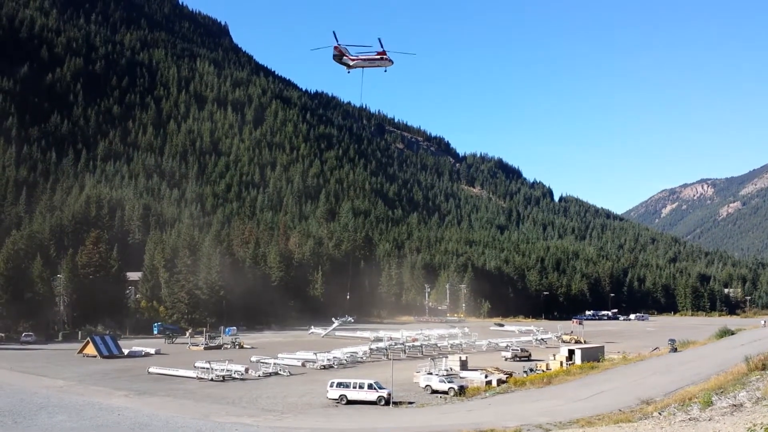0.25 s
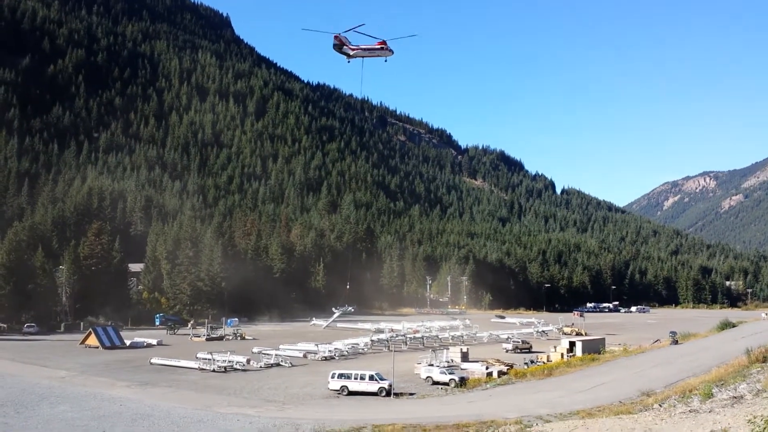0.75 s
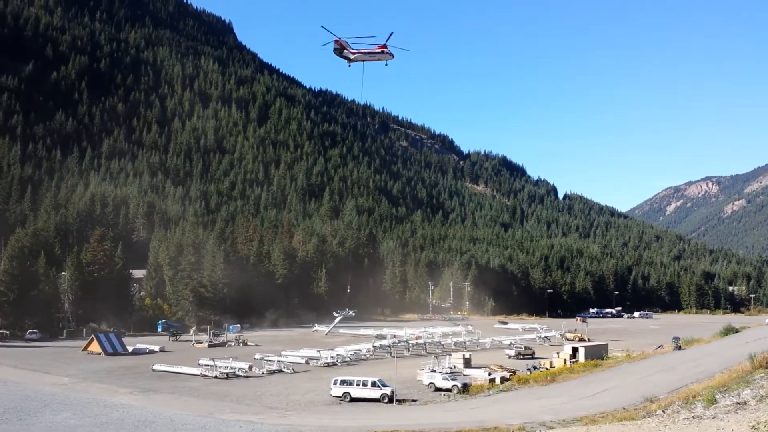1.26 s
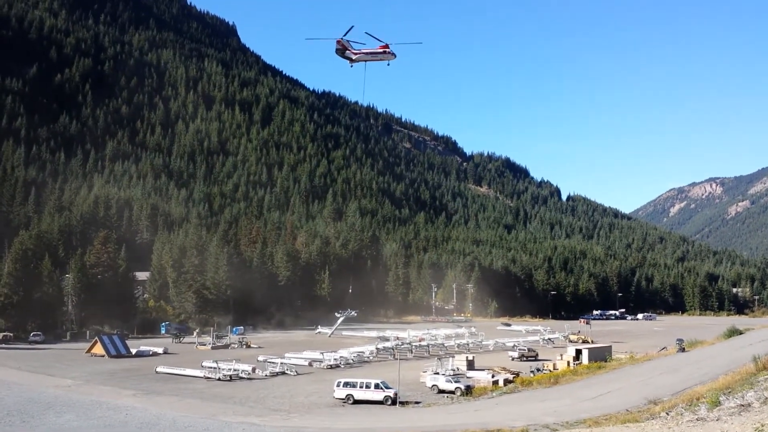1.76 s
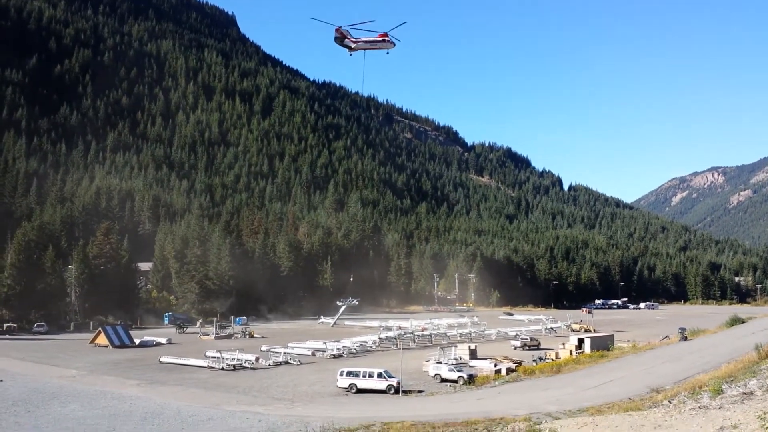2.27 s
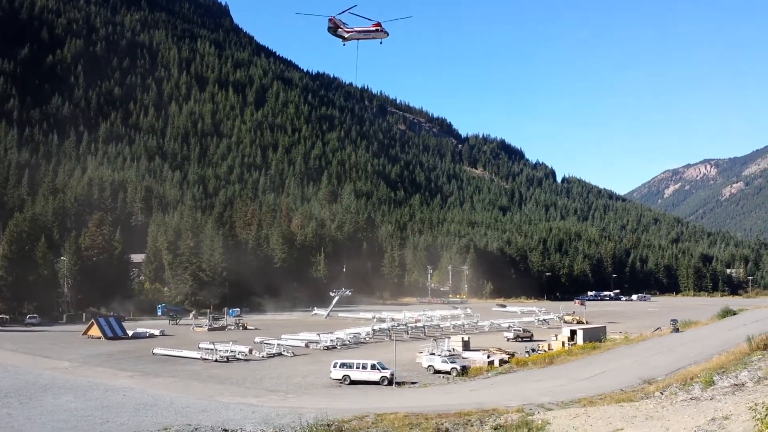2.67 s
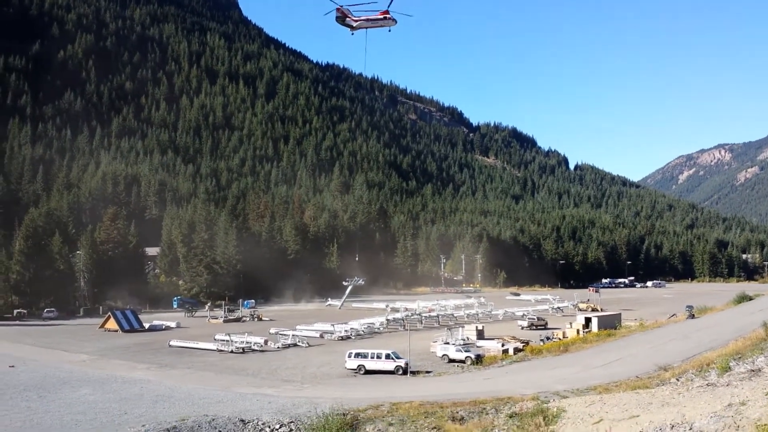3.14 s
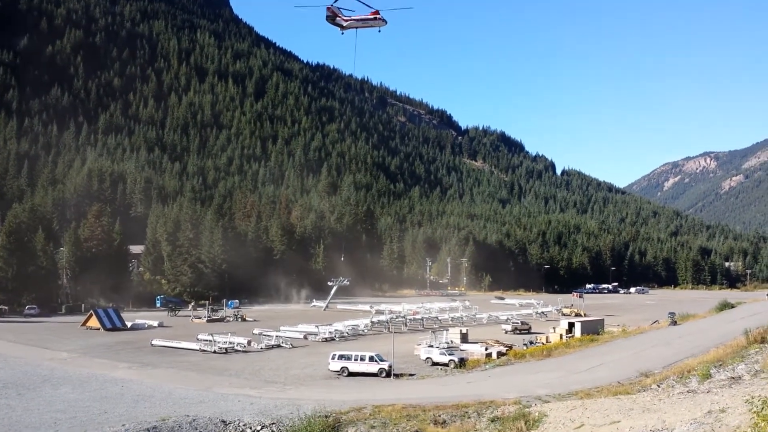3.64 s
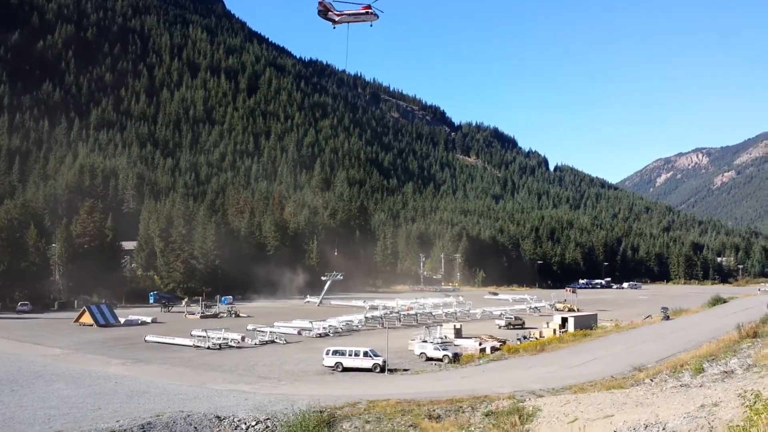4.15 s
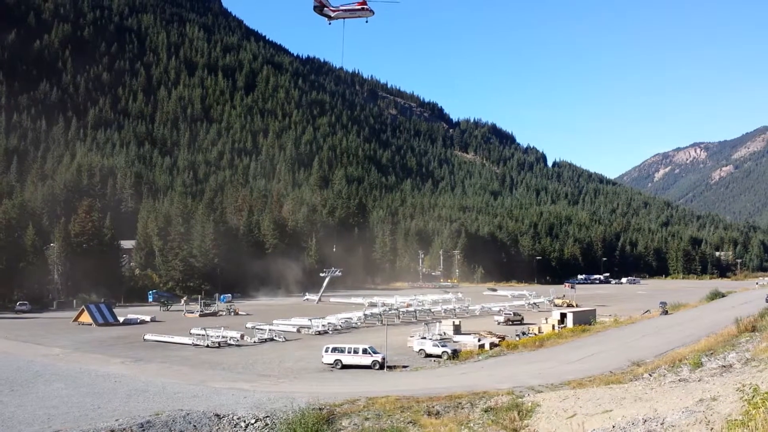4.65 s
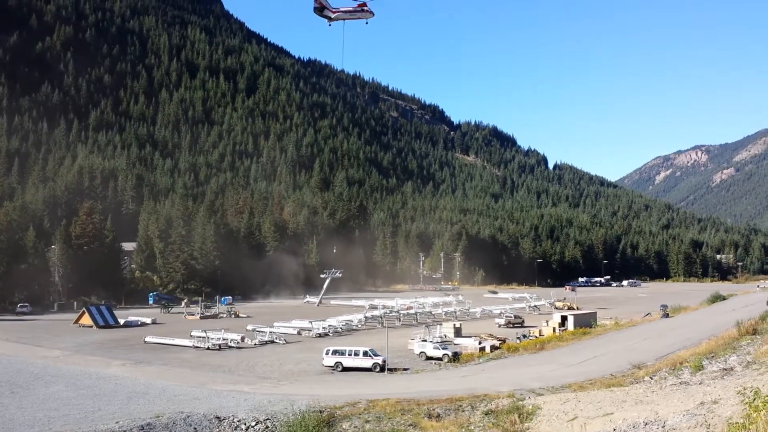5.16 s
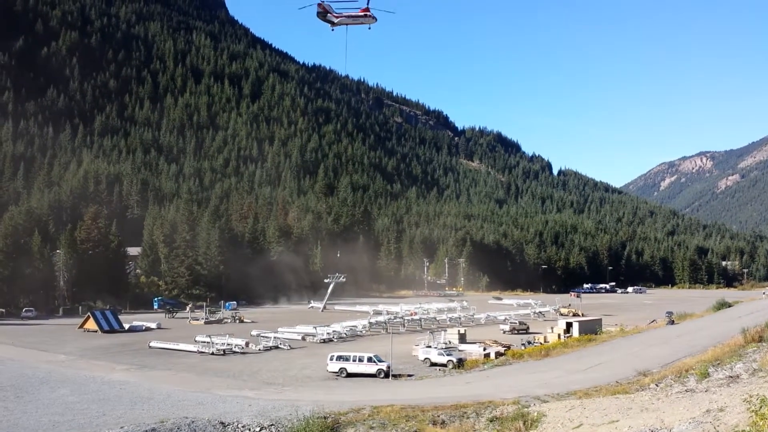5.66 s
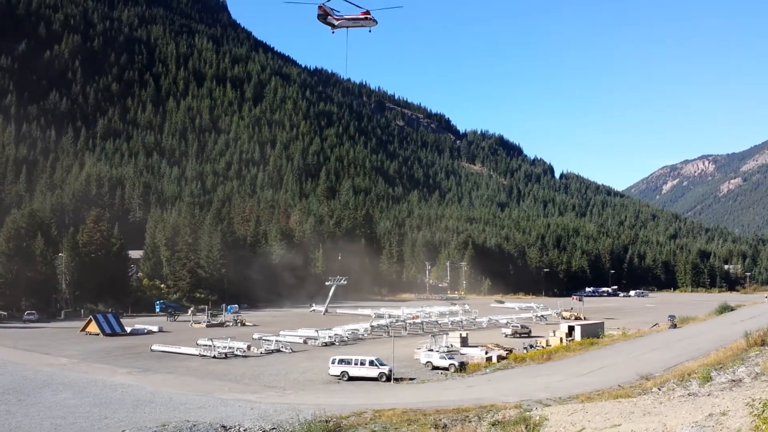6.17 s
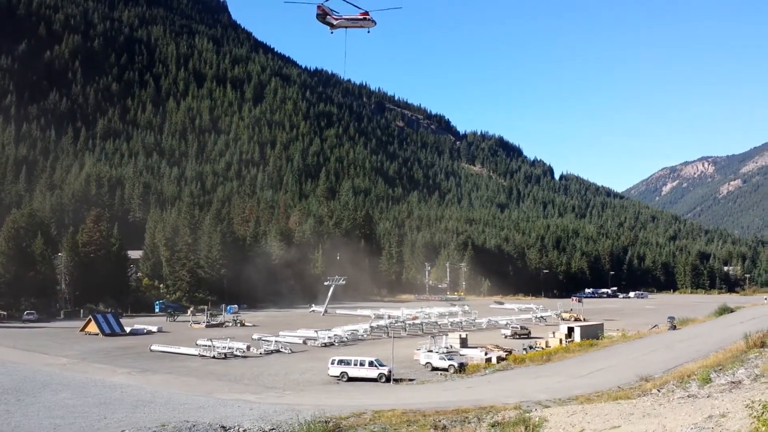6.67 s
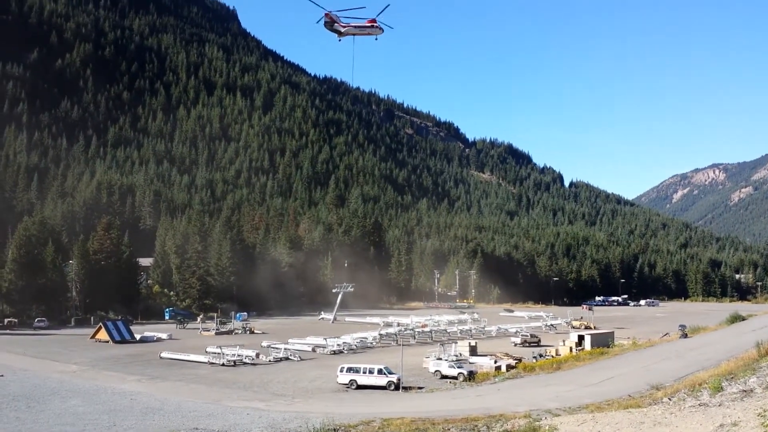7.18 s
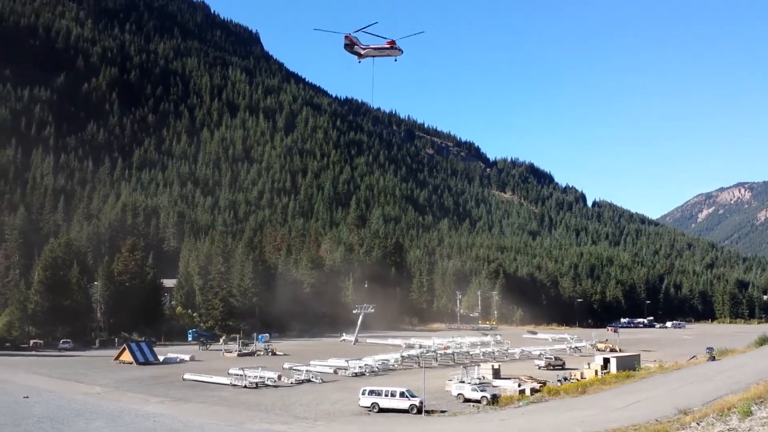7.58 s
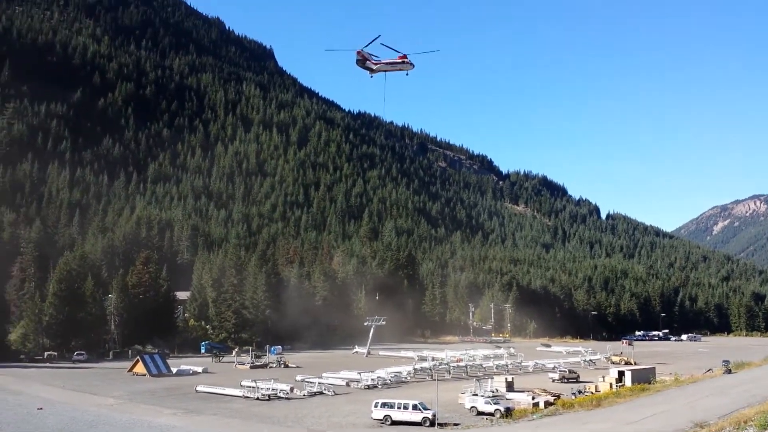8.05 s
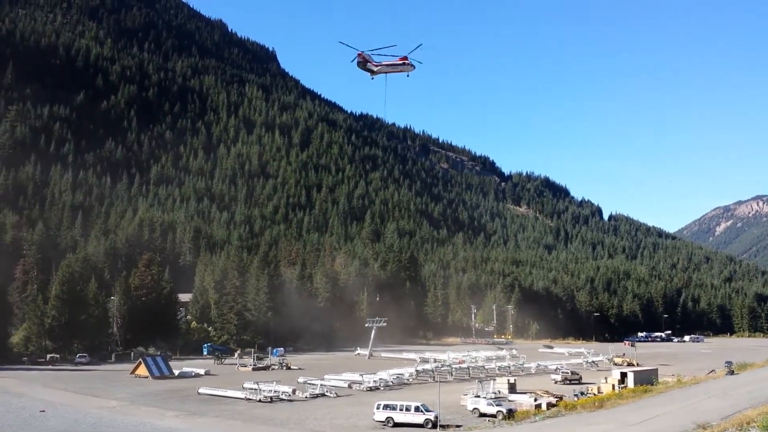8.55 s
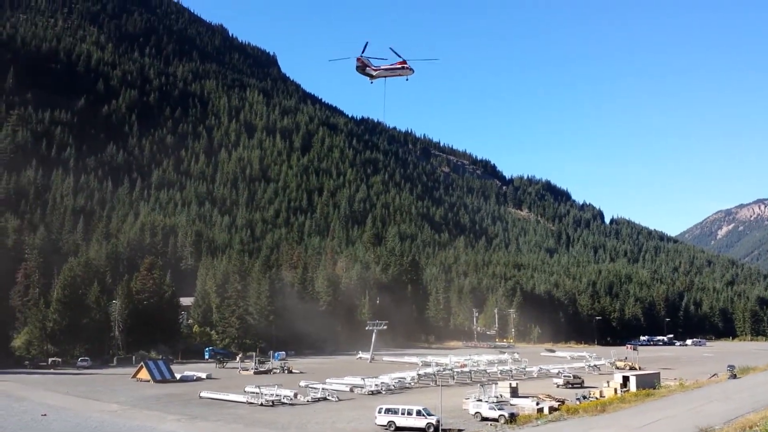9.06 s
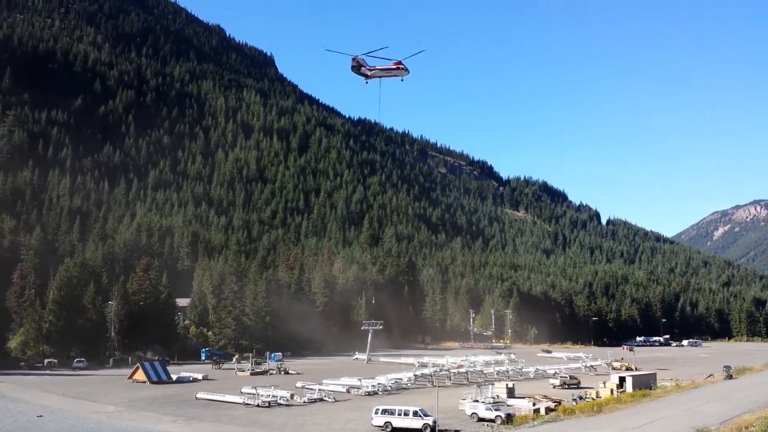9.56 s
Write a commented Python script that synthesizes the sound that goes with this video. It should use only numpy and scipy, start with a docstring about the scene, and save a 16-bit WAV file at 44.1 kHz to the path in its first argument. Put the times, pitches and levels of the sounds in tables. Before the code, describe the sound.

Rapid thudding rotor chop, about thirteen double beats a second, with sharp cracks, windy roar, faint gear whine and slope echoes throughout.

```python
"""A gravel lot below a forested mountainside, where a heavy tandem-rotor helicopter hovers.
Each blade radiates a low thump and a slap as filtered pulses; steep spikes add the cracks of cut vortices.
Random delayed copies make the slope's echo, steady lags its faces, and late clicks the gravel's returns.
Shaped noise gives downwash, rumble, blade swish and a rustle; wavering tones give a gear whine and hums.
A bright ringing tick and later two hard clicks on the right are heard; thin clicks join the second rotor."""
import sys
import numpy as np
from scipy import signal
from scipy.fft import rfft, irfft, next_fast_len
from scipy.io import wavfile
from scipy.ndimage import uniform_filter1d, minimum_filter1d

SR = 44100
rng = np.random.default_rng(int(sys.argv[2]) if len(sys.argv) > 2 else 0)


def pcm_store(signal):
    """Save signal as 16-bit PCM."""
    levels = np.round(np.clip(np.atleast_2d(signal), -1, 1) * 32767)
    wavfile.write(sys.argv[1], SR, levels.astype(np.int16).T)


N = 433062
TIME = np.arange(N) / SR
SOUND_SPEED = 343  # m/s
# blade period, first arrival and second rotor's offset before travel delay, all in s
BLADE_S, FIRST_S, SECOND_ROTOR_S = .07597, .060, .038


def undb(db):
    """Logarithmic level: decibels become an amplitude ratio."""
    return 10 ** (np.asarray(db) / 20)


def curve(table, at, axis):
    """Linear interpolation: one column of a table is joined by straight lines."""
    rows = np.array(table)
    return np.interp(at, rows[:, 0], rows[:, axis])


def unit(x):
    """Normalisation: the signal is scaled to rms 1."""
    return x / np.sqrt(np.mean(x ** 2))


def colour(x, spectrum, lean=0, causal=False):
    """Linear filtering: lean/rad skews a pulse by phase rotation; causal selects minimum phase."""
    size = 2 * next_fast_len((N + SR // 4) // 2)
    hz, db = np.transpose(spectrum)
    freq = np.maximum(np.arange(size // 2 + 1) * SR / size, 1)
    gain = undb(np.interp(np.log(freq), np.log(hz), db))
    if causal:
        # folding the cepstrum makes the response ring only after it starts
        cepstrum = irfft(np.log(gain))[:size // 2]
        gain = np.exp(2 * rfft(cepstrum, size) - cepstrum[0])
    response = gain * np.exp(1j * lean)
    return irfft(rfft(x, size) * response, size)[..., :N]


def pulses(times, db, spectrum, lean=0, causal=False):
    """Impulse response: each time gets a pressure dip, db being its level over 5 ms."""
    train = np.zeros(N)
    places = np.clip(np.round(times * SR).astype(int), 0, N - 1)
    np.add.at(train, places, -undb(db) * (times < N / SR))
    hz, gain_db = np.transpose(spectrum)
    log_freq = np.log(np.arange(1, SR // 2))
    energy = np.mean(undb(np.interp(log_freq, np.log(hz), gain_db)) ** 2)
    return colour(train, spectrum, lean, causal) / np.sqrt(energy / (.005 * SR))


def walk(rate):
    """Random modulation: normal values, rate per second, joined by lines, with a spread near 1."""
    knots = rng.standard_normal(2048)
    return 1.2 * np.interp(TIME * rate, np.arange(len(knots)), knots)


def air(spectrum, apart_hz):
    """Spatial coherence: stereo noise is alike at both ports in the bass, far less so in the treble."""
    mid, side = rng.standard_normal((2, N))
    side = signal.sosfilt(signal.butter(2, apart_hz, "high", fs=SR, output="sos"), side)
    return unit(colour(mid + undb(-1.0) * np.array([side, -side]), spectrum))


# Drift of the hover: [t/s, extra distance from the listener/m]
DRIFT = [(0, 0), (.7, .1), (3, -.55), (3.7, -.15), (4.3, -.03), (6.2, -.55), (7.4, .1), (9.2, 1.35),
         (9.8, 2)]


def travel_delay(times):
    """Propagation delay: extra distance divided by the speed of sound."""
    return curve(DRIFT, times, axis=1) / SOUND_SPEED


def blades(offset):
    """Periodic source: one rotor's blades arrive in turn, later as the aircraft drifts off."""
    times = FIRST_S + offset + BLADE_S * np.arange(int(N / SR / BLADE_S) + 1)
    return times + travel_delay(times)


def throb(delay_s, width_s):
    """Periodic modulation: a smooth swell once per blade, delay_s after the first rotor's thump."""
    turn = (TIME - FIRST_S - delay_s - travel_delay(TIME)) / BLADE_S
    return np.exp(-(np.sin(np.pi * turn) * BLADE_S / np.pi / width_s) ** 2)


# The rotors work harder, ease off and return: [t/s, thump relative level/dB, downwash relative level/dB]
HOVER = [(0.1, -33, -32.5), (0.47, -35, -35), (1.17, -28, -31.5), (1.78, -28.5, -29.5), (3.33, -26.5, -28),
         (3.63, -28.5, -26.5), (4.91, -27, -26), (6.41, -21, -22), (8.07, -21, -25), (8.79, -25, -24.5),
         (9.51, -19.5, -25), (9.7, -21.5, -23)]
# Downwash spectrum: [f/Hz, relative level/dB]
WASH_SPECTRUM = [(20, -4), (60, -2.5), (120, 10), (200, 12), (330, 10), (500, 8.5), (830, 3), (1050, 1),
                 (1600, 0), (2250, 0.45), (2900, -7.5), (4400, -10), (5500, -17.5), (6400, -18.5),
                 (8700, -32.5), (11000, -90.5)]


def downwash():
    """Turbulence noise: torn air lulls before each first-rotor blade and surges after; each band churns."""
    surge = 1 + .5 * throb(0.0041, 0.0037) + 0.34 * throb(0.029, 0.012) - 0.14 * throb(-0.0078, 0.003)
    rest, roar = air(WASH_SPECTRUM, apart_hz=895), 0
    for edge_hz in (450, 1100, 1900, 3000):
        band = signal.sosfiltfilt(signal.butter(3, edge_hz, fs=SR, output="sos"), rest)
        roar = roar + band * undb(2 * walk(55))
        rest = rest - band
    churn = undb(0.93 * walk(70) + 0.11 * walk(11))
    return unit(roar + rest) * unit(surge * churn) * undb(curve(HOVER, TIME, axis=2))


def breeze(db):
    """Incoherent flow noise: stirred air rumbles softly on each port by itself, at the thump's level curve."""
    spectrum = [(15, -19.0), (40, -7.5), (60, 5.0), (110, -6.5), (300, -3.0), (600, -1.5), (3000, -79.5)]
    rumble = colour(rng.standard_normal((2, N)), spectrum)
    return unit(rumble) * undb(db + curve(HOVER, TIME, axis=1) + 1.6 * walk(3.0))


# Louder swishes of a blade tip: [t/s, level/dB, half length/s]
SWISHES = [(0.238, -32, 0.0072), (6.533, -30.5, 0.0086), (7.532, -26, 0.019), (7.608, -26, 0.0053),
           (7.677, -25.5, 0.015), (7.763, -34, .007), (8.133, -44, 0.0044), (8.222, -31, .008),
           (8.903, -28, 0.0043), (8.978, -23, 0.0049), (9.056, -32, 0.0054)]
# Swish spectrum: [f/Hz, relative level/dB]
SWISH_SPECTRUM = [(300, -45.5), (1500, -23.5), (3000, 1), (4200, 11), (5500, 3), (6800, -3.5),
                  (8800, -13.5), (12000, -79.5)]


def swish():
    """Amplitude-modulated noise: blade tips hiss as they swing towards the listener, a few much louder."""
    flicker_db = 3.5 * walk(13)
    steady = throb(0.024, 0.0094) * undb(curve(HOVER, TIME, axis=2) - 11.5 + flicker_db)
    flares = sum(undb(db) * np.exp(-((TIME - s) / length_s) ** 2) for s, db, length_s in SWISHES)
    return air(SWISH_SPECTRUM, apart_hz=1000) * (steady + flares)


# Gear whine: [t/s, level/dB]
WHINE = [(0, -52), (1.5, -51), (1.95, -41), (2.2, -48), (2.6, -44.5), (3.1, -50), (3.5, -43.5), (4.9, -40),
         (5.3, -35), (5.55, -35.5), (5.8, -40), (6.3, -36.5), (7.1, -41.5), (7.7, -36), (8.05, -45.5),
         (8.35, -34.5), (8.9, -41.5), (9.2, -35.5), (9.8, -43.5)]


def gearbox(hz, flutter_db):
    """Doppler shift: a whine sinks as the aircraft backs off; moving air gives its line a skirt of flutter."""
    heard_s = TIME - travel_delay(TIME)
    phase = 2 * np.pi * hz * (heard_s + np.cumsum(0.000986 * walk(7)) / SR)
    line = [np.sin(phase + 1.0 * walk(20)) * undb(3.5 * walk(16)) for _ in range(2)]
    skirt = [walk(60) * np.sin(phase) + walk(60) * np.cos(phase) for _ in range(2)]
    whine = unit(unit(np.array(line)) + undb(flutter_db) * unit(np.array(skirt)))
    return whine * undb(curve(WHINE, TIME, axis=1))


# Echo from the slope: [t/s, relative level/dB]
ECHO = [(0, -27.5), (.6, -28.5), (1.25, -20), (1.9, -24.5), (3, -21.5), (4.4, -19), (5.1, -21.5),
        (5.8, -16.5), (7, -18), (8.1, -21), (9.8, -20)]
# Slope and hollow-boom spectra: [f/Hz, relative level/dB]
SLOPE_SPECTRUM = [(20, -64), (45, -43.5), (100, 0.5), (150, -8.5), (225, 6), (260, -8), (330, 1),
                  (450, -20.5), (620, -14), (820, -3), (1100, -19), (2200, -33), (4000, -71.5),
                  (12000, -110)]
BOOM_SPECTRUM = [(30, -67.5), (140, -10), (185, 1), (205, 9.5), (235, -9.5), (280, -25), (2000, -93.5)]


def slope(times, t60, shift_rate, side_db, count=5):
    """Reverberation: trees and slope scatter every pulse; paths trade places as the aircraft moves."""
    chance = rng.standard_normal((len(times), 2)).T
    wander_s = .0005 * chance[0]
    source = pulses(times + wander_s, 1.5 * chance[1], SLOPE_SPECTRUM)
    # a hollow boom builds up in the valley, then holds
    start_db, full_db, full_s = -25.5, -0.5, 9.2
    boom_db = start_db + (full_db - start_db) * np.minimum(times / full_s, 1)
    source = source + pulses(times + wander_s, boom_db + 3.2 * chance[1], BOOM_SPECTRUM)
    size = next_fast_len(N)
    spectrum, age = rfft(source, size), TIME[:SR]
    echoes = []
    for _ in range(count + 1):
        # about 160 reflections a second, falling 60 dB per t60
        paths = rng.standard_normal(SR) * (rng.random(SR) < 160 / SR) * undb(-60 * age / t60)
        # the hover is already under way, so the tail wraps round to fill the start
        echoes.append(unit(irfft(spectrum * rfft(paths, size), size)[:N]))
    weights = np.array([walk(shift_rate) for _ in range(count)])
    mid = np.sum(weights * echoes[:count], axis=0) / np.sqrt(np.sum(weights ** 2, axis=0))
    side = np.array([echoes[-1], -echoes[-1]])
    return (mid + undb(side_db) * side) * undb(curve(ECHO, TIME, axis=1))


# Overtones of the beat that stand out of the echo: [t/s, half length/s, f/Hz, level/dB]
HUMS = [(3.598, 5.1, 236.9, -26), (6.399, 1.1, 184.4, -29.5), (9.2, 1, 197.3, -21.5)]


def hums():
    """Harmonics: single overtones of the beat swell out of the echo for a while, wavering a little."""
    out = 0
    for s, length_s, hz, db in HUMS:
        phase = 2 * np.pi * np.cumsum(hz * (1 + 0.003 * walk(9))) / SR
        swell = np.exp(-((TIME - s) / length_s) ** 2)
        out = out + np.sin(phase) * undb(db + 1.7 * walk(13)) * swell
    return out


# Round slap of each rotor, steadier than its crack: [t/s, first rotor level/dB, second rotor level/dB]
SLAPS = [(0, -16, -31), (.6, -16, -21.5), (2.4, -13.5, -32), (3.4, -10.5, -19), (4.6, -17, -21),
         (5.2, -20, -24), (6.1, -19, -16.5), (7.5, -15.5, -24), (8.7, -17.5, -18), (9.8, -18.5, -13.5)]
# Trim of the deepest part of the thump: [t/s, level/dB]
DEEP = [(0, 2), (1.2, -3), (2.5, -3), (3.8, -0.5), (5.5, 2.5), (6.5, 1.5), (7.8, -2), (8, -7), (8.8, -2),
        (9.8, -2)]
# Thump and slap spectra: [f/Hz, relative level/dB]
THUMP_SPECTRUM = [(18, -66.5), (27, -43.5), (39, -39.5), (52, -6.5), (80, -5), (110, -0.5), (160, -4),
                  (250, -35), (400, -47), (900, -75.5), (3000, -110)]
SLAP_SPECTRUM = [(20, -68), (70, -22.5), (160, 7), (260, 12.5), (380, 8), (520, -13), (820, -21),
                 (1500, -37), (4000, -61), (12000, -100)]


def rotor(times, column, thump_db, thump_lean, slap_lead_s, slap_lean):
    """Impulsive radiation: each blade makes a round thump and an uneven slap, a deep dip of pressure."""
    chance = rng.standard_normal((len(times), 3)).T
    thump_level = curve(HOVER, times, axis=1) + thump_db + 0.28 * chance[0]
    thump = pulses(times, thump_level, THUMP_SPECTRUM, thump_lean)
    deep = signal.sosfiltfilt(signal.butter(4, 90, fs=SR, output="sos"), thump)
    thump = thump + deep * (undb(curve(DEEP, TIME, axis=1)) - 1)
    slap_times = times - slap_lead_s + 0.00018 * chance[1]
    slap_level = curve(SLAPS, times, axis=column) + 1.0 * chance[2]
    return thump + pulses(slap_times, slap_level, SLAP_SPECTRUM, slap_lean)


# How hard blades cut the wake; the first rotor briefly clears it near 5 s:
# [t/s, first rotor relative level/dB, second rotor relative level/dB]
WAKE = [(0, -20.5, -20.5), (.6, -16.5, -22), (2.4, -16.5, -15), (3, -17.5, -16.5), (3.9, -19, -17),
        (4.7, -16.5, -13.5), (5.2, -30, -20.5), (6, -24.5, -21), (7.5, -14.5, -20.5), (8.9, -27.5, -19.5),
        (9.8, -23, -33)]


def strengths(times, column, trim_db, hits, crack_db):
    """Blade-vortex interaction: crack, bite and shock levels follow the wake by chance, but for square hits."""
    chance = rng.standard_normal((len(times), 3)).T
    wake_db = curve(WAKE, times, axis=column) + trim_db
    offsets_db = np.array([[crack_db], [-12], [-26.5]])  # crack, bite, shock front
    levels = wake_db + offsets_db + 3.5 * chance
    for s, *hit_db in hits:
        levels[:, np.abs(times - s).argmin()] = hit_db
    return levels


# Spectrum of the hard bite: [f/Hz, relative level/dB]
BITE_SPECTRUM = [(200, -31), (900, -1.5), (1450, 6.5), (2300, 1), (2900, -7.5), (4500, -25), (9000, -66),
                 (15000, -93.5)]


def scatter(times, db, lag_s, spread_s, count):
    """Diffuse reflection: rough ground returns each bite as small clicks strewn over spread_s after lag_s."""
    chance = rng.random((len(times), count))
    clicks = times[:, None] + lag_s + spread_s * (np.arange(count) + chance) / count
    return -pulses(clicks.ravel(), np.repeat(db, count), BITE_SPECTRUM)


def ground(x, lag_s, db):
    """Specular reflection: the gravel returns a slightly later copy."""
    return x + undb(db) * np.interp(TIME - lag_s, TIME, x, left=0)


# Spectra of woody crack, bright shock front and torn-air snap: [f/Hz, relative level/dB]
CRACK_SPECTRUM = [(40, -21), (200, 6), (500, 17), (680, 15), (860, 18.5), (1100, -1), (1550, 1.5),
                  (2250, -28), (3200, -24.5), (7000, -42), (10000, -78.5), (15000, -90)]
SHOCK_SPECTRUM = [(300, -42.5), (1500, -7), (3200, 9.5), (4300, 12), (6500, 0), (9000, -17.5),
                  (12000, -32.5), (15000, -47.5)]
SNAP_SPECTRUM = [(30, -43.5), (200, 3), (450, 5), (830, 8), (1100, -1.5), (2200, -8), (3300, -26),
                 (7000, -41.5), (10000, -62.5), (14000, -95.5)]


def cracks(times, levels, lead_s, snap_db, smear_s, count=3):
    """Blade-vortex impulse: a steep spike, weaker strands, ground returns and a snap of torn air behind."""
    crack_db, bite_db, shock_db = levels
    chance, luck = rng.standard_normal((len(times), 2, count)).transpose(1, 2, 0)
    order = np.arange(count)[:, None]
    # weaker strands follow the first spike, differently for every blade
    strand_db = (2 * luck - 4 * order) * (order > 0)
    starts = times - lead_s + smear_s * rng.standard_normal(len(times))
    strands = (starts + .0007 * order + .0002 * order * chance).ravel()
    front = 0
    for db, spectrum in ((crack_db, CRACK_SPECTRUM), (bite_db, BITE_SPECTRUM), (shock_db, SHOCK_SPECTRUM)):
        causal = spectrum is CRACK_SPECTRUM
        # the minus sign turns the dips into upward spikes
        front = front - pulses(strands, (db + strand_db).ravel(), spectrum, causal=causal)
    gravel = scatter(starts, bite_db - 7, lag_s=0.0041, spread_s=0.00273, count=3)
    far_lot = scatter(starts, bite_db - 16.5, lag_s=0.011, spread_s=.024, count=4)
    last = np.maximum(np.searchsorted(starts, TIME) - 1, 0)
    age = np.maximum(TIME - starts[last], 0)
    burst = np.exp(-age / .007) * (1 - np.exp(-(age / .0004) ** 2))
    snap = undb(crack_db + snap_db)[last] * burst * air(SNAP_SPECTRUM, apart_hz=1400)
    return ground(undb(-1.56) * front, lag_s=.0048, db=-10.0) + gravel + far_lot + snap


# Broad faces of the slope: [lag/s, level relative to the echo curve/dB]
FACES = [(0.015, -8.5), (.0208, -4), (.030, -2), (.047, -6), (.057, -6)]
# Spectrum returned by the faces: [f/Hz, relative level/dB]
FACE_SPECTRUM = [(30, -49), (90, -24.5), (150, -8), (205, 1), (260, -5), (330, -1), (450, -8), (820, -15),
                 (1300, -34), (4000, -83)]


def faces(times):
    """Discrete echoes: the nearest slope faces repeat each beat in one pattern, so the chop hums steadily."""
    lag_s, db = np.transpose(FACES)[:, :, None]
    sway_s = .00015 * rng.standard_normal((len(times), len(FACES))).T
    level_db = curve(ECHO, times, axis=1) + db
    return pulses((times + lag_s + sway_s).ravel(), level_db.ravel(), FACE_SPECTRUM)


# A bright ringing tick, then two hard clicks on the right:
# [t/s, click level/dB, ring level/dB, left minus right/dB]
TICKS = [(0.955, -47, -46, -6), (0.964, -42, -20.5, 10), (0.9668, -27.5, -31, -6),
         (3.2454, -14, -47, -33.5), (3.7799, -13, -41, -10)]
# Click spectrum: [f/Hz, relative level/dB]
TICK_SPECTRUM = [(800, -32), (4000, 17), (6500, 15.5), (12000, 12), (14500, 10), (18000, -28)]


def ticks(ring_hz=6200, ring_s=0.0016):
    """Impulse and damped oscillation: bright clicks, ringing early on and hard later, lean to one side."""
    out = np.zeros((2, N))
    for s, click_db, ring_db, pan_db in TICKS:
        age = np.maximum(TIME - s, 0)
        ring = np.sin(2 * np.pi * ring_hz * age) * np.exp(-age / ring_s)
        tick = pulses(np.array([s]), click_db, TICK_SPECTRUM) + undb(ring_db) * ring
        out += tick * undb(pan_db * np.array([[.5], [-.5]]))
    return out


def rustle(s, width_s, db):
    """Band-limited noise: a brief, ragged, very high rustle, stronger on the right."""
    spectrum = [(4000, -26), (7500, 4), (9300, 5), (10500, -10), (11600, -6), (12500, -38)]
    hiss = air(spectrum, apart_hz=1000)
    ragged_db = 3.8 * walk(160)
    swell = np.exp(-((TIME - s) / width_s) ** 2)
    return hiss * swell * unit(undb(ragged_db)) * undb([[db - 7], [db]])


# The second rotor nicks one more vortex for a while: [t/s, level/dB]
NICK = [(5.5, -53), (6.2, -36), (6.72, -23.5), (7.2, -28), (7.7, -39), (8.4, -39), (8.9, -26), (9.6, -46)]
# Spectrum of the thin dry click: [f/Hz, relative level/dB]
THIN_SPECTRUM = [(400, -29.5), (1400, -6.5), (2300, 7.5), (3500, -3), (4800, -4.5), (7000, -26.5),
                 (12000, -70.5)]


def nicks(times, lag_s):
    """Blade-vortex interaction: one thin click per blade, lag_s after its beat."""
    level_db = curve(NICK, times, axis=1) + 1.3 * rng.standard_normal(len(times))
    return -pulses(times + lag_s, level_db, THIN_SPECTRUM)


# First-rotor blades that hit a vortex squarely:
# [t/s, woody crack relative level/dB, hard bite relative level/dB, shock front relative level/dB]
SQUARE_HITS = [(.06, -17.5, -22, -36), (.136, -17, -30, -48), (.212, -19, -33, -41), (.44, -24, -27.5, -39),
               (.516, -22, -34, -37), (.592, -26, -24.5, -35), (.668, -19.5, -25.5, -49),
               (.744, -24, -22, -39), (.896, -22, -22.5, -39), (1.048, -20, -20, -40),
               (1.124, -21.5, -23, -46), (1.199, -17, -20, -45), (1.427, -15, -24, -42),
               (1.579, -18, -29, -44), (1.731, -16.5, -25.5, -53), (1.807, -17.5, -22.5, -35),
               (1.883, -25.5, -23.5, -62), (1.959, -18.5, -28, -34), (2.186, -18, -22, -41),
               (2.262, -13.5, -22.5, -44), (2.338, -12.5, -25, -42), (2.414, -14, -21, -35),
               (2.49, -15, -25.5, -46), (2.566, -10, -29, -50), (2.642, -13, -29, -40),
               (2.793, -25.5, -21, -37), (2.869, -17.5, -33, -29.5), (2.945, -16, -23, -46),
               (3.021, -17, -25, -48), (3.097, -20.5, -27.5, -50), (3.25, -20.5, -22.5, -26.5),
               (3.326, -17, -24, -28.5), (3.402, -10, -22.5, -24), (3.478, -17, -25, -22.5),
               (3.554, -19, -21, -24.5), (3.63, -12.5, -25.5, -30), (3.706, -17.5, -25.5, -30.5),
               (3.782, -9, -19, -23), (3.858, -16.5, -19.5, -38), (3.934, -22.5, -17.5, -47),
               (4.01, -15, -21, -32), (4.162, -16, -49, -28.5), (4.314, -27.5, -28, -28),
               (4.542, -16.5, -23, -30.5), (6.288, -22, -24, -44), (7.049, -18, -22, -32),
               (7.277, -13, -18, -43), (7.429, -25.5, -21.5, -30), (7.81, -17.5, -29, -44),
               (7.962, -14, -22, -25.5), (8.038, -20, -25, -36), (8.191, -28, -25, -45),
               (9.714, -22.5, -22, -27)]
# How far the first rotor's spike runs ahead of its thump: [t/s, lead/s]
LEAD = [(4.6, .0029), (5.6, .0012), (7.4, .0016), (7.9, .0028)]


def scene():
    """Superposition: both rotors and their echoes add to the air and machine noise."""
    first, second = blades(0), blades(SECOND_ROTOR_S)
    beat = rotor(first, 1, thump_db=12.5, thump_lean=0.21, slap_lead_s=0.00018, slap_lean=0.19)
    beat = beat + rotor(second, 2, thump_db=12.5, thump_lean=-0.86, slap_lead_s=0.00085, slap_lean=-0.4)
    first_levels = strengths(first, 1, trim_db=0, hits=SQUARE_HITS, crack_db=-2.0)
    crack = cracks(first, first_levels, curve(LEAD, first, axis=1), snap_db=0.0, smear_s=.0001)
    second_levels = strengths(second, 2, trim_db=-5.5, hits=[], crack_db=-0.5)
    crack = crack + cracks(second, second_levels, lead_s=.0026, snap_db=0.0, smear_s=.0009)
    crack = crack + nicks(second, lag_s=.017)
    both = np.concatenate([first, second])
    echo = undb(-0.7) * slope(both, t60=1.13, shift_rate=2.5, side_db=-21) + faces(first) + hums()
    roar = undb(5.0) * downwash() + swish() + gearbox(hz=3146, flutter_db=2) + breeze(db=-9.0)
    return beat + crack + echo + roar + ticks() + rustle(s=1.962, width_s=0.061, db=-41.5)


def limit(x, top, size=45):
    """Peak limiting: the gain falls for a millisecond or two (size in samples) round peaks above top."""
    gain = np.minimum(1, top / (np.abs(x).max(axis=0) + 1e-9))
    lowest = minimum_filter1d(gain, 2 * size + 1)
    return x * uniform_filter1d(uniform_filter1d(lowest, size), size)


# Resonance of the left port: [f/Hz, gain/dB]
LEFT_PORT = [(200, .5), (380, 1.3), (700, .5), (2400, .5), (3600, -1.5), (4600, -4), (5500, -2), (6300, 6),
             (7600, 3), (9000, -3)]


def record(dry):
    """Port resonance colours the left; a limiter holds the peaks and a low-pass filter cuts the top."""
    ports = np.array([colour(dry[0], LEFT_PORT), dry[1]])
    held = limit(ports, top=.92)
    return signal.sosfilt(signal.ellip(8, .2, 70, 15200, fs=SR, output="sos"), held)


dry = scene()
out = record(dry)
pcm_store(out)
```